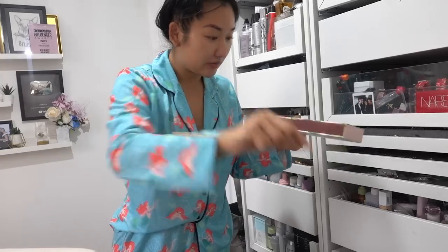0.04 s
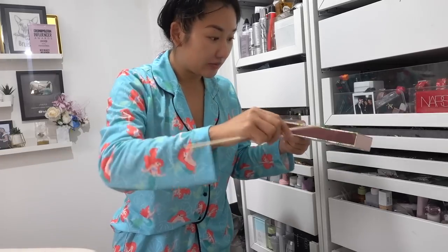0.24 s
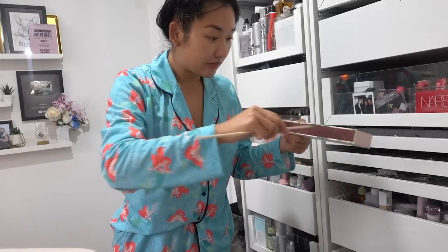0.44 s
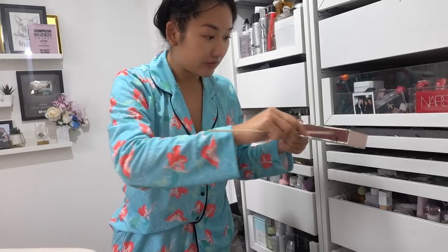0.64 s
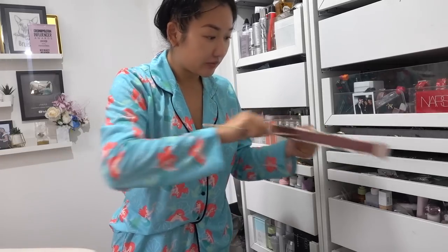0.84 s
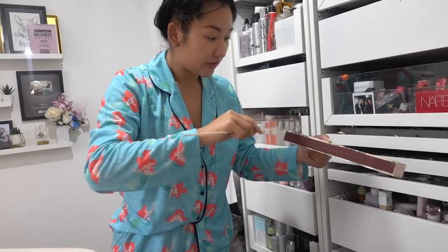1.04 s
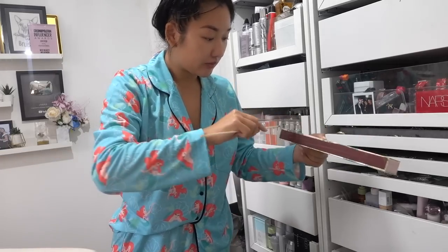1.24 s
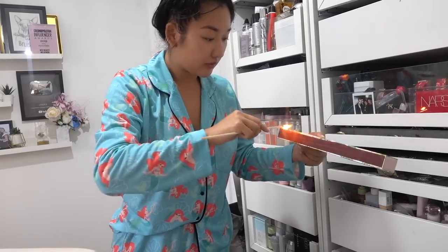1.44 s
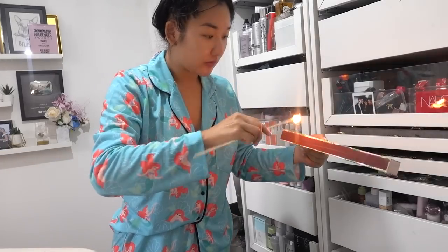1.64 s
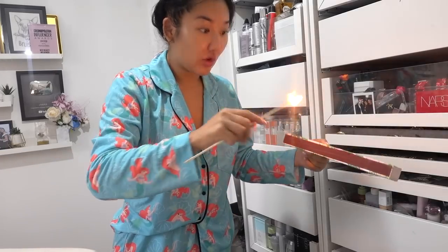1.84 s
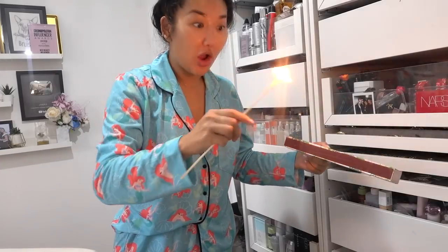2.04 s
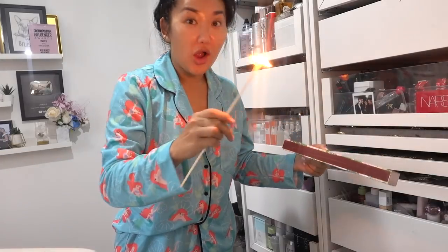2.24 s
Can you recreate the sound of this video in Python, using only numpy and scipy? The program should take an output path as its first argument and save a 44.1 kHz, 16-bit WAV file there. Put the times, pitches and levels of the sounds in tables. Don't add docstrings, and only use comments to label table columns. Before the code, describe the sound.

A large match taps the rough side of a cardboard box and drags in one short gritty scrape, then sizzles faintly, pops alight and burns softly; small quiet room, close phone microphone.

```python
import sys
import numpy as np
from scipy import signal
from scipy.fft import rfft, irfft
from scipy.io import wavfile

SR = 44100
rng = np.random.default_rng(int(sys.argv[2]) if len(sys.argv) > 2 else 0)


def wav_out(sig):
    wavfile.write(sys.argv[1], SR, np.round(np.clip(np.atleast_2d(sig).T, -1, 1) * 32767).astype(np.int16))


def decibels_to_gain(level_db):
    exponent = np.asarray(level_db, float) / 20
    return 10 ** exponent


N = 100680
LEAD = 8192
T = (np.arange(N + LEAD) - LEAD) / SR
FLOOR_DB = -71

# time in seconds, peak in dB.
POP = [
    (1.478, -39.5),
    (1.4802, -41),
    (1.4835, -48),
    (1.4865, -58),
    (1.4885, -57),
]
# time in seconds, peak in dB.
SPIT = [
    (1.9023, -43.5),
    (1.9046, -49.5),
    (1.9078, -57),
]
# frequency in Hz, level in dB per Hz.
SIZZLE_COLOUR = [(880, -1), (1500, -2.5), (2130, -12), (4240, -4.5), (7500, -5), (10400, -2), (13200, -1),
                 (15700, -10)]


def rms_one(x):
    return x / np.sqrt(np.mean(x ** 2) + 1e-30)


def curve(rows):
    return np.interp(T, *np.transpose(rows))


def at_hz(points, hz):
    table_hz, value = np.transpose(points)
    return np.interp(np.log(hz + 1), np.log(table_hz), value)


def colour(x, spectrum):
    hz = np.fft.rfftfreq(len(x), 1 / SR)
    low_edge = np.minimum(hz / spectrum[0][0], 1) ** 2
    return rms_one(irfft(rfft(x) * decibels_to_gain(at_hz(spectrum, hz)) * low_edge, len(x)))


def noise(spectrum):
    return colour(rng.standard_normal(len(T)), spectrum)


def drift(rate_hz):
    r = np.exp(-2 * np.pi * rate_hz / SR)
    white = rng.standard_normal(len(T) + SR)
    return rms_one(signal.lfilter([1], [1, -2 * r, r * r], white)[SR:])


def grains(per_s, spread_db):
    chance, size, sign = rng.random((3, len(T)))
    return (chance < per_s / SR) * decibels_to_gain(-spread_db * np.log(size + 0.021)) * np.sign(sign - .5)


def swell(centre_s, width_s):
    return np.exp(-((T - centre_s) / width_s) ** 2)


def click(s, db):
    out = np.zeros(len(T))
    out[int(s * SR) + LEAD] = decibels_to_gain(db)
    return out


def ring(clicks, hz, t60_s):
    r = decibels_to_gain(-60 / (min(t60_s, .12) * SR))
    w = 2 * np.pi * hz / SR
    return signal.lfilter([0, np.sin(w)], [1, -2 * r * np.cos(w), r * r], clicks + 1e-18)


def band(x, low_hz, high_hz):
    sos = signal.butter(2, [low_hz, min(high_hz, 20000)], "band", fs=SR, output="sos")
    return signal.sosfilt(sos, x)


def knock(events, modes, low_hz, soft_hz, first_sign=1):
    contacts = first_sign * click(*events[0]) + sum(click(s, db) for s, db in events[1:])
    body = sum(ring(contacts, hz, t60_s) * decibels_to_gain(db) for hz, db, t60_s in modes)
    return band(band(body, low_hz, soft_hz), low_hz, soft_hz)


def earlier_stroke():
    # frequency in Hz, level in dB per Hz.
    earlier_colour = [(180, -14), (300, -17), (614, -2.5), (1720, -10.5), (2360, -5.5), (3500, -6),
                      (4440, -6), (6100, -4.5), (12100, -9), (16000, -7.5)]
    end_s, level_db = -0.0077, -37.5
    return (T < end_s) * decibels_to_gain(level_db) * noise(earlier_colour)


def background():
    # frequency in Hz, level in dB per Hz.
    floor_colour = [(30, -22), (50, -8), (100, -14), (127, -7.5), (243, -12.5), (480, -17), (2630, -32.5),
                    (15600, -28.5)]
    # centre in seconds, width in seconds, level in dB.
    rustles = [
        (0.236, 0.047, -81),
        (0.19, 0.019, -75.5),
        (0.44, 0.028, -82),
    ]
    hum_hz, hum_peak_db, hum_wobble_db = 100, -70, 2.0
    hiss = decibels_to_gain(FLOOR_DB) * noise(floor_colour)
    hum_phase = 2 * np.pi * hum_hz * T + .45 * drift(9)
    hum = decibels_to_gain(hum_peak_db + hum_wobble_db * drift(14)) * np.sin(hum_phase)
    cloth = sum(decibels_to_gain(db) * swell(s, width_s) for s, width_s, db in rustles)
    return hiss + hum + cloth * noise(SIZZLE_COLOUR)


def brush():
    # frequency in Hz, level in dB per Hz.
    brush_colour = [(600, -10.5), (1100, -5), (1400, -10), (2200, -20), (4000, -22.5)]
    centre_s, width_s, level_db = 0.097, 0.038, -64.5
    return decibels_to_gain(level_db) * swell(centre_s, width_s) * colour(grains(3000, 2.5), brush_colour)


def ticks():
    # time in seconds, peak in dB, pitch in Hz, t60 in seconds.
    contacts = [(0.163, -58, 3840, 0.0027), (0.165, -56, 6000, 0.0029), (0.165, -55, 11200, 0.0034),
                (.1645, -56, 14300, .004), (0.3336, -50, 450, 0.029), (.3335, -50.5, 550, 0.016),
                (0.7388, -42, 11600, 0.0028), (.7387, -47, 14800, .002), (.7387, -54, 8500, .002),
                (0.913, -33, 1050, 0.014), (1.99, -54, 2520, 0.0094), (1.994, -60, 2200, .01),
                (1.831, -53, 7900, 0.0069), (1.8312, -60, 9900, 0.0033), (1.8315, -59, 11400, .004)]
    return sum(band(ring(click(s, db), hz, t60_s), 0.61 * hz, 2.2 * hz) for s, db, hz, t60_s in contacts)


def landing():
    # time in seconds, peak in dB.
    contacts = [
        (.7387, -30.5),
        (.7409, -47),
    ]
    # frequency in Hz, level in dB, t60 in seconds.
    modes = [(733, -4.5, 0.01), (935, -6.5, 0.019), (1230, -2.5, 0.019), (1400, -4, 0.0068),
             (2400, -23, .008), (3040, -13, 0.006), (4040, -15, 0.0041), (5000, -29, 0.003)]
    return knock(contacts, modes, 0.83 * modes[0][0], soft_hz=6000)


def stroke():
    # time in seconds, grit level in dB.
    drag_rows = [
        (.7405, -67),
        (.754, -56),
        (.766, -45.5),
        (.784, -40),
        (.83, -39),
        (.874, -33.5),
        (.89, -35.5),
        (.914, -37),
    ]
    # frequency in Hz, level in dB per Hz.
    grit_colour = [(880, -41), (1500, -13), (1650, -4), (1770, -22), (2520, -10), (4000, -6.5),
                   (9010, -11.5), (13500, 2), (15600, -8.5)]
    # frequency in Hz, level in dB per Hz.
    rasp_colour = [(88, -66), (150, -24.5), (270, -11), (581, -11.5), (876, -7), (1440, -20), (1860, -5),
                   (2760, -16.5), (3010, -11.5), (9000, -8.5), (11700, -7), (19800, -120)]
    # time in
    # seconds, level in dB over the grit.
    cracks = [(.7668, 9), (.7731, 1), (.7792, 5), (0.7935, 9), (0.805, 13), (0.814, 4), (0.822, 9),
              (.841, 14), (0.847, 5), (0.85, 11), (0.8556, -1), (0.86, 0), (0.87, 10), (0.8733, -9),
              (0.8907, 13), (.8978, 2), (.9031, -9), (0.9117, 1)]
    # time in seconds, peak
    # in dB.
    catches = [(.769, -37), (0.775, -36.5), (0.779, -45), (0.797, -36), (0.846, -44), (.86, -34),
               (0.872, -35), (.876, -42), (0.885, -31.5), (.912, -47), (0.974, -46), (0.989, -51.5)]
    # frequency in Hz, level in dB, t60 in seconds.
    wall_modes = [(450, -20, 0.063), (640, -12.5, 0.019), (878, 0.5, 0.013), (980, -0.5, 0.017),
                  (1200, -7.5, 0.015), (1390, -3.5, 0.0082), (1880, -10, 0.0098), (3600, -6, 0.0065)]
    lift_s, lift_fade_s, crack_s = .918, 0.0069, .0003
    rasp_db, rasp_follows = -30.5, 3.04
    snag_db, snag_follows = -59, 0.15

    drag_db = curve(drag_rows)
    swing_db = drag_db - drag_db.max()
    touch = np.clip((T - drag_rows[0][0]) / 0.0024, 0, 1) * np.clip((lift_s - T) / lift_fade_s, 0, 1)

    cracks_db = sum(db * swell(s, crack_s) for s, db in cracks)
    grit_db = drag_db + cracks_db - 0.16 + 1.0 * drift(110)
    grit = decibels_to_gain(grit_db) * colour(grains(30000, 1.6), grit_colour)
    rasp = decibels_to_gain(rasp_db + rasp_follows * swing_db) * colour(grains(8000, 1.6), rasp_colour)

    snags = touch * decibels_to_gain(snag_db + snag_follows * swing_db) * rms_one(grains(810, 3.5))
    snags = snags + band(sum(click(s, db) for s, db in catches), 230, 2900)
    walls = 0
    for k, (hz, db, t60_s) in enumerate(wall_modes):
        walls = walls + ring(snags, hz, t60_s) * decibels_to_gain(db) * (-1) ** k
    return touch * (grit + rasp), walls


def fire():
    # time in seconds, sizzle level in dB.
    sizzle_rows = [(1.04, -68), (1.066, -73.5), (1.118, -68), (1.266, -69), (1.294, -66), (1.494, -67),
                   (1.516, -71), (1.772, -70.5), (1.836, -69), (1.854, -70.5), (2.01, -65.5),
                   (2.064, -68.5), (2.28, -68.5)]
    # time in seconds, roar level in dB.
    flame_rows = [
        (1.0, -74),
        (1.2, -77),
        (1.45, -80.5),
        (1.52, -73.5),
        (1.7, -70.5),
        (1.95, -68),
        (2.28, -65.5),
    ]
    # frequency in Hz, level in dB per Hz.
    flame_colour = [(120, -9), (200, 0.5), (630, -3.5), (671, 1.5), (715, -4), (908, -2.5), (2600, -10),
                    (7920, -12.5), (9000, -19), (11700, -40), (19800, -120)]
    mirror_ms, mirror_swing_ms, mirror_db = .42, .04, -17
    lit = np.clip((T - .9) / 0.057, 0, 1)
    fizz = colour(grains(20000, 3.2), SIZZLE_COLOUR)
    delay_s = (mirror_ms + mirror_swing_ms * drift(0.66)) / 1000
    echo = np.interp(T - delay_s, T, fizz)
    sizzle = decibels_to_gain(curve(sizzle_rows) - 1 + .8 * drift(15)) * rms_one(fizz + decibels_to_gain(mirror_db) * echo)
    roar = decibels_to_gain(curve(flame_rows) + 1.54 * drift(24)) * noise(flame_colour)
    return lit * (sizzle + roar)


def jets():
    # start in seconds, end in seconds, from Hz, to Hz, level in dB.
    jet_rows = [(1.07, 1.24, 11900, 12170, -79), (1.08, 1.22, 14900, 15100, -87),
                (1.237, 1.42, 12800, 14200, -81), (1.281, 1.515, 11500, 11500, -87),
                (1.256, 1.426, 9740, 9800, -82), (1.32, 1.475, 14800, 15100, -83),
                (1.765, 1.86, 13000, 12600, -71.5), (1.815, 1.89, 7760, 7700, -79),
                (1.883, 2.047, 12500, 13300, -78), (1.96, 2.046, 10100, 11200, -79),
                (2.045, 2.28, 7800, 7400, -82)]
    width_hz = 330
    out = 0
    for start_s, end_s, from_hz, to_hz, db in jet_rows:
        along = np.clip((T - start_s) / (end_s - start_s), 0, 1)
        phase = 2 * np.pi * np.cumsum(from_hz + (to_hz - from_hz) * along) / SR
        envelope = decibels_to_gain(db) * np.sqrt(np.sin(np.pi * along) + 1e-12)
        out = out + envelope * (drift(width_hz) * np.sin(phase) + drift(width_hz) * np.cos(phase))
    return out


def pop():
    # frequency in Hz, level in dB, t60 in seconds.
    modes = [(111, -2, 0.03), (224, -15, 0.036), (475, -4, 0.037), (820, -32, 0.006), (670, -14, 0.048),
             (1050, 3.5, 0.0078), (1460, -5, 0.0043), (2020, -25, 0.0022), (2700, -13.5, 0.0029),
             (4450, -13, 0.0044)]
    return knock(POP, modes, 0.83 * modes[0][0], soft_hz=4500, first_sign=-1)


def puff():
    # frequency in Hz, level in dB per Hz.
    puff_colour = [(59, -32), (100, -6), (220, -23), (449, 6), (865, -6.5), (1700, -8), (3500, -15.5),
                   (4550, -54), (7700, -120)]
    level_db, t60_s, rise_s = -56, 0.19, 0.0048
    since_s = np.maximum(T - POP[0][0], 0)
    return decibels_to_gain(level_db - 60 * since_s / t60_s) * np.minimum(since_s / rise_s, 1) * noise(puff_colour)


def spit():
    # frequency in Hz, level in dB, t60 in seconds.
    modes = [(3410, -4, 0.016), (3730, 4, 0.01), (4160, -0.5, 0.0074), (4770, -7, 0.014),
             (5360, -17, 0.008), (6000, -27, .005)]
    return knock(SPIT, modes, low_hz=3150, soft_hz=7000)


def room(x):
    # frequency in Hz, t60 in seconds.
    room_t60 = [(150, 0.3), (700, 0.32), (3000, 0.24), (8000, 0.26), (16000, 0.15)]
    # frequency in Hz, level in dB.
    room_colour = [(60, -11), (1000, -6), (8000, -1.5), (15000, -1.5), (20000, -6.5)]
    first_echo_s, build_s = 0.003, 0.013
    t = np.arange(SR // 2) / SR
    spectrum = rfft(colour(rng.standard_normal(len(t)), room_colour))
    octave = np.log2(np.fft.rfftfreq(len(t), 1 / SR) + 1)
    tail = 0
    for centre in range(6, 16):
        share = np.clip(1 - abs(octave - centre), 0, 1)
        tail = tail + irfft(spectrum * share, len(t)) * decibels_to_gain(-60 * t / at_hz(room_t60, 2 ** centre))
    tail = tail * np.clip((t - first_echo_s) / build_s, 0, 1)
    return signal.fftconvolve(x, tail / np.sqrt(np.sum(tail ** 2)))[:len(x)]


def scene():
    # frequency in Hz, level in dB per Hz.
    side_hiss = [(35, -30), (60, -2), (231, -0.5), (892, -9.5), (1830, -18), (2210, -14.5), (2540, -18.5),
                 (12400, -10), (15600, -9)]
    side_db = -13
    surface, walls = stroke()
    drag = earlier_stroke() + surface
    hits = brush() + ticks() + landing() + pop() + spit()
    hit_share = np.where(T > SPIT[0][0] - .05, .55, 1)
    wet = room(decibels_to_gain(-9.5) * drag + decibels_to_gain(-16) * walls + decibels_to_gain(-10) * hits * hit_share)
    mid = background() + drag + walls + hits + wet + fire() + jets() + puff()
    side = decibels_to_gain(FLOOR_DB + side_db) * noise(side_hiss)
    return np.array([mid + side, mid - side])[:, LEAD:]


def top_cut(x):
    return signal.sosfilt(signal.butter(12, 16580, fs=SR, output="sos"), x)


def record(dry):
    peak_round, low_cut_hz, top_hz = .13, 70, 15930
    mix = peak_round * np.tanh(dry / peak_round)
    mix = signal.sosfilt(signal.butter(4, low_cut_hz, "high", fs=SR, output="sos"), mix)
    mix = signal.sosfilt(signal.cheby2(20, 50, top_hz, fs=SR, output="sos"), mix)
    return top_cut(mix)


dry = scene()
out = record(dry)
wav_out(out)
```